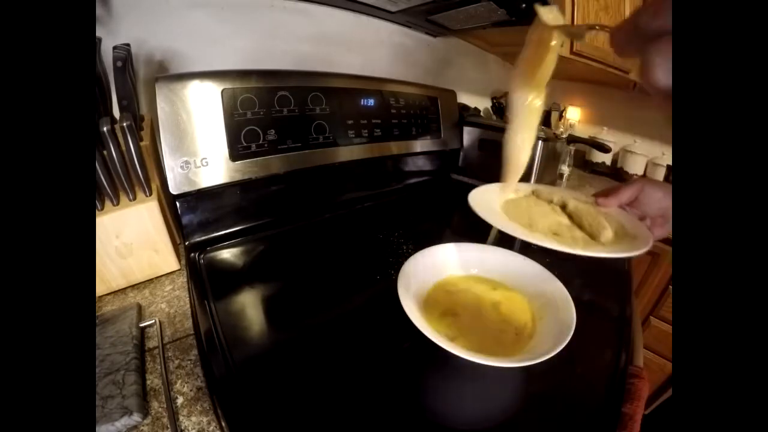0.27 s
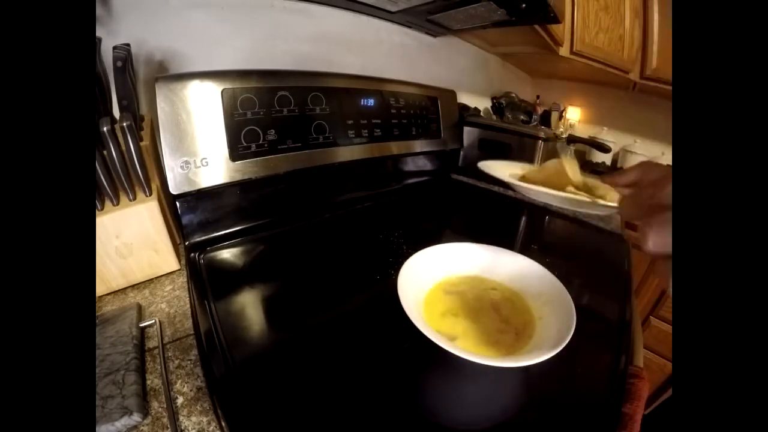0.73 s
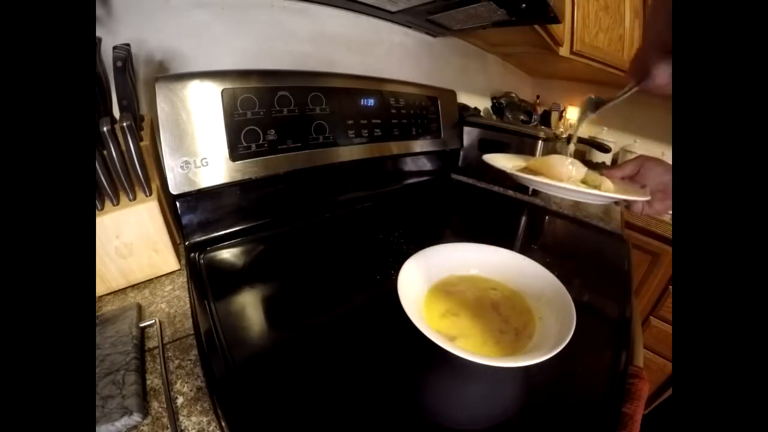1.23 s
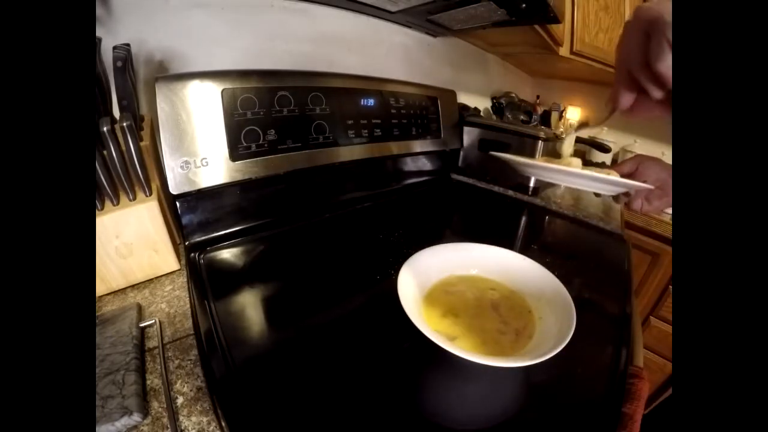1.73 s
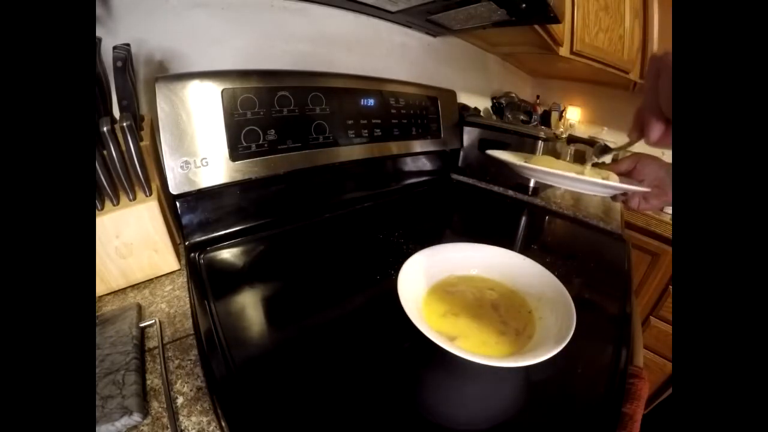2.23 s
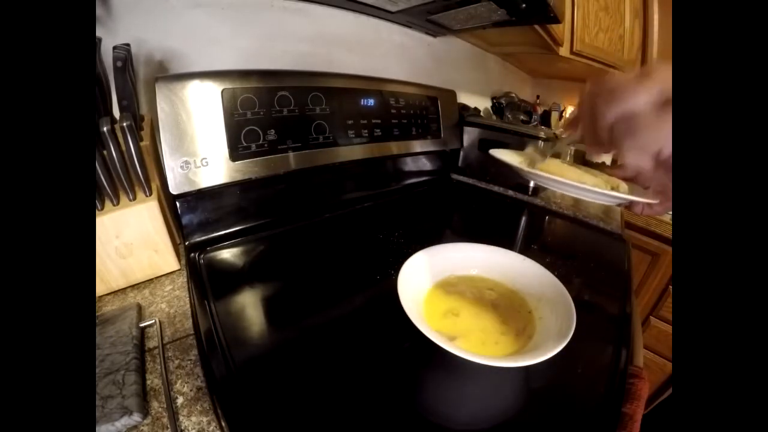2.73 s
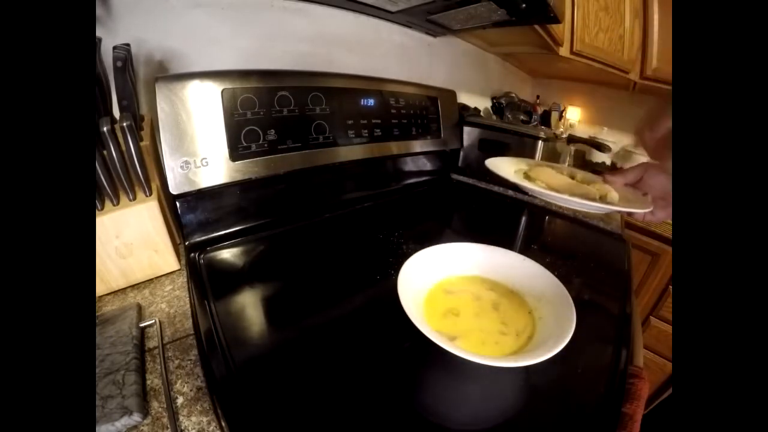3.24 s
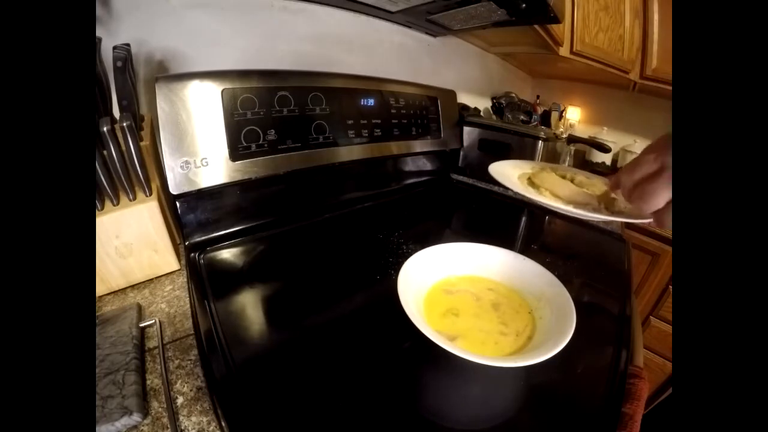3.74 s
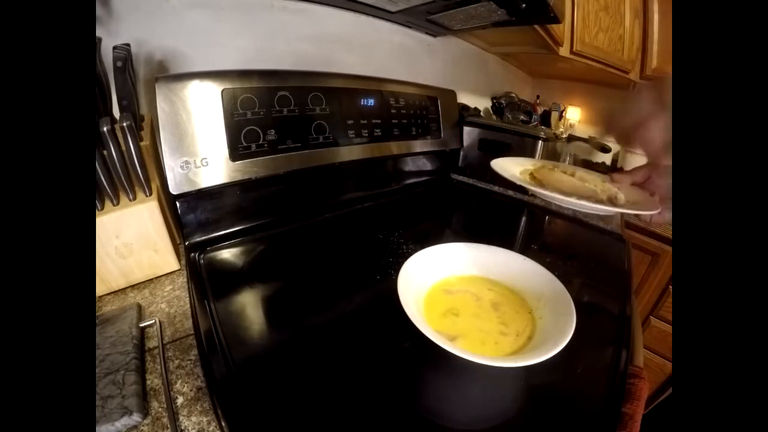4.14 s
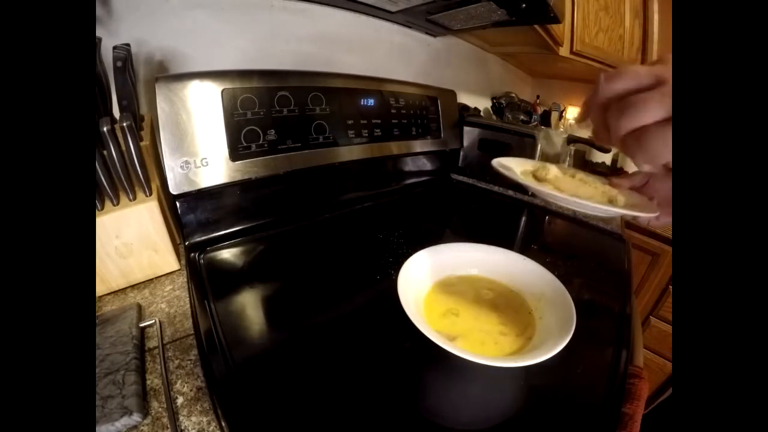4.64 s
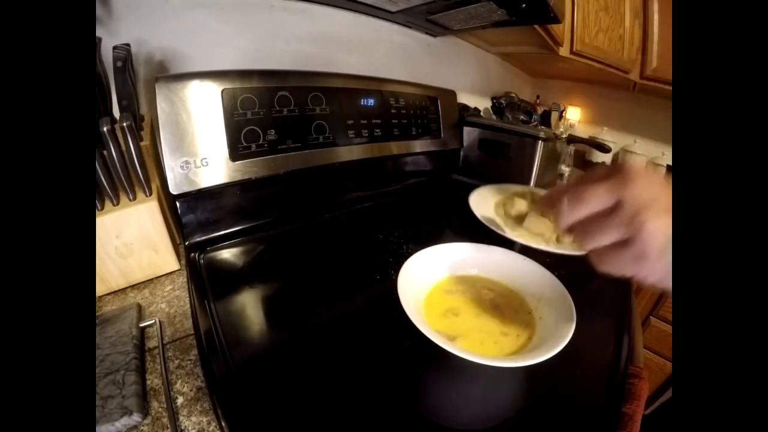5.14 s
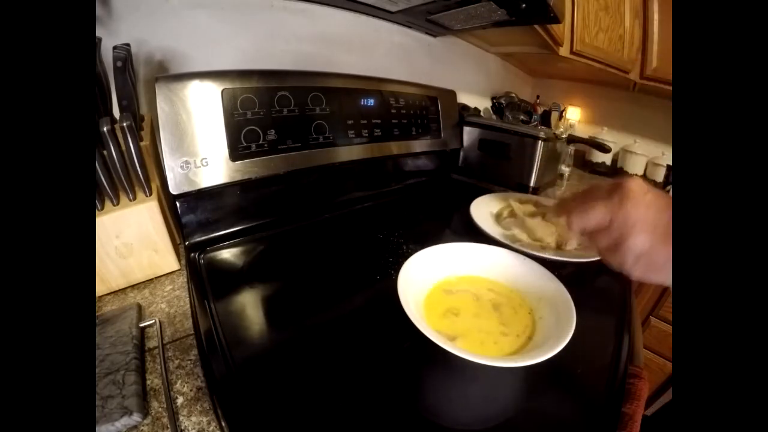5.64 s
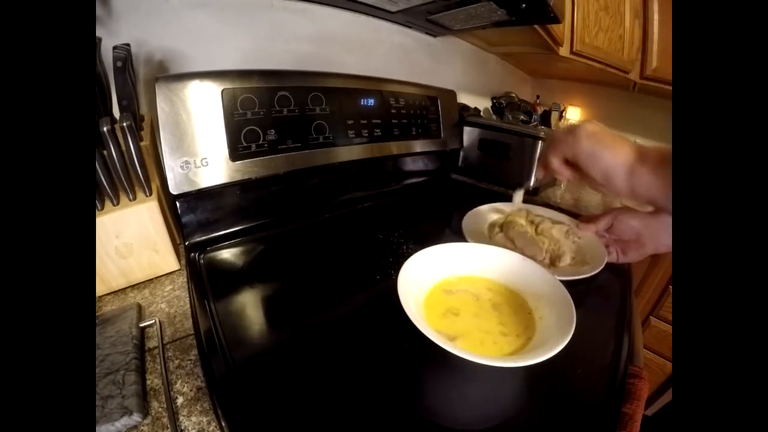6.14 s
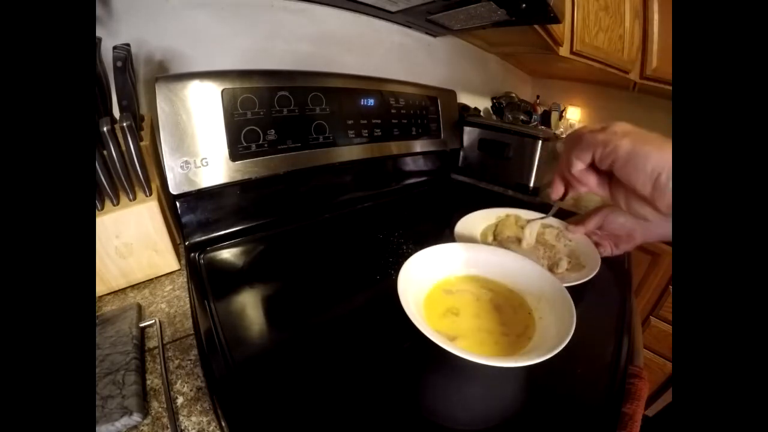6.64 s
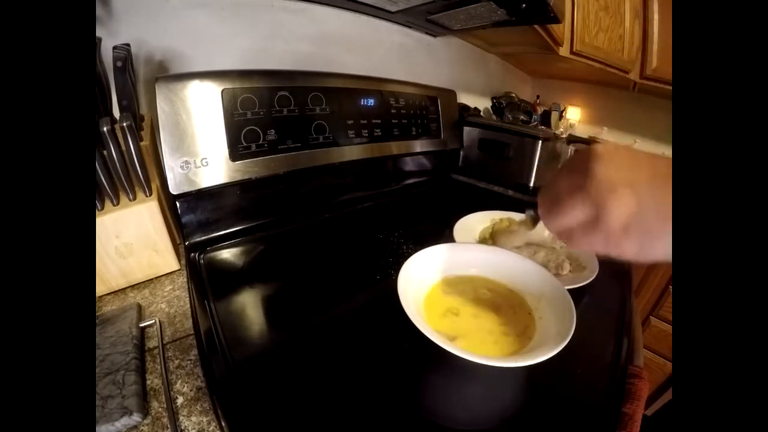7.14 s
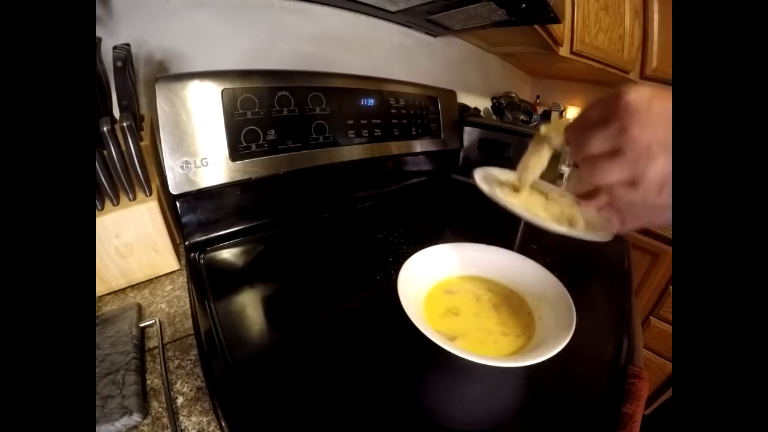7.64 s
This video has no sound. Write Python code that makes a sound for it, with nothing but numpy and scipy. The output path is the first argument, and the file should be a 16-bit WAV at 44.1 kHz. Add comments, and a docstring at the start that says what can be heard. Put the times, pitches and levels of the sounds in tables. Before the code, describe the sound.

In a small kitchen with a steady low hum, food lands with a soft wet plop. A fork clatters, scrapes and briefly squeaks on a ceramic plate, then gives two sharp clinks and some lighter taps. Near the end, something knocks hard against the microphone stand and rubs and judders along it with a low rumble. Everything sounds close.

```python
"""A mains hum, a low drone and room air open on a soft wet plop of food; a faint hiss comes and goes.
A fork taps, scrapes and squeaks on a hand-held ceramic plate. The plate's ring is short, damped by
hand and food; the small kitchen carries it on. Late on, the microphone's stand is held and rumbles:
something knocks against it, then rubs and judders along it, ringing its modes by stick-slip."""
import sys
import numpy as np
from scipy import signal
from scipy.fft import rfft, irfft, next_fast_len
from scipy.io import wavfile
from scipy.ndimage import uniform_filter1d

SR = 44100
rng = np.random.default_rng(int(sys.argv[2]) if len(sys.argv) > 2 else 0)


def file_out(sig):
    """Save sig as 16-bit WAV at sys.argv[1]."""
    # one column per channel
    cols = np.atleast_2d(sig).T
    # limit, then scale
    lim = np.clip(cols, -1, 1)
    pcm = np.round(lim * 32767).astype(np.int16)
    wavfile.write(sys.argv[1], SR, pcm)


N = 347949
TIME = np.arange(N) / SR
RING = TIME[:SR // 2]  # time axis of one ring-out

# mains hum partials: (harmonic number, level [dB])
HUM_PARTIALS = [(1, -35.5), (2, -48.5), (4, -75.5), (17, -73.5)]
# room air: (frequency [Hz], gain [dB])
AIR_EQ = [(110, -32), (180, -8), (319, -4.5), (471, -12), (517, -8.5), (952, -16), (1040, -14),
          (1150, -16.5), (1660, -18), (1820, -16.5), (2000, -19.5), (15000, -26)]
# low drone under the hum: (frequency [Hz], gain [dB])
DRONE_EQ = [(10, -11.5), (28, -7.5), (42, -7.5), (75, -4.5), (95, -16), (125, -5.5), (170, -18),
            (300, -36.5), (900, -82)]
# width of the room tone, side against mid: (frequency [Hz], gain [dB])
ROOM_WIDTH = [(60, -3), (110, -10.5), (200, -9.5), (380, -7.5), (700, -6.5), (1290, -5.5), (2380, -3),
              (4400, -1), (8120, -0.5), (15000, 0)]
# wet plop: (frequency [Hz], gain [dB])
PLOP_EQ = [(200, -7), (500, 5), (900, -1), (1500, -14), (4000, -32), (12000, -45)]
# hiss cues: (start [s], length [s], level [dB])
HISS_CUES = [(0.628, 0.093, -57), (1.076, 0.5, -60), (3.608, 0.41, -58), (4.35, 0.4, -67),
             (5.454, 0.25, -70), (7.505, 0.38, -63.5)]
# band of the hiss: (frequency [Hz], gain [dB])
HISS_EQ = [(1500, -30), (3000, -6), (4300, -1), (5900, 0), (6800, -18), (10000, -40)]
# ceramic plate: (frequency [Hz], t60 before contact damping [s], well gain [dB], rim gain [dB])
PLATE_MODES = [(750, 0.12, -52.5, -8), (963, .04, -13.5, -73), (1280, 0.0536, -12, -18),
               (1345, 0.094, -6, -16), (1586, 0.045, 7, -16), (2474, 0.035, 4.5, -10),
               (2675, 0.07, -15, -24), (3335, 0.11, -4.5, 5), (3510, 0.086, -8.5, -14),
               (3583, 0.043, -20, -4), (4370, 0.067, -2.5, 6), (5410, 0.055, 3, -29),
               (5416, 0.033, -7.5, 0), (5610, 0.054, -14, -1), (6050, 0.0725, -6.5, -11),
               (6460, 0.046, -11.5, 2), (6970, 0.042, -1, -47), (7680, .06, -23.5, -10),
               (9600, 0.0636, -27, -29), (10700, 0.067, -26.5, -16.5), (11690, 0.064, -20, -28),
               (13550, .07, -22.5, -24)]
# fork on plate: (time [s], level [dB], place [0 well to 1 rim], brightness [dB/octave])
FORK_TAPS = [(0.673, -48.5, 0, 2), (0.8136, -33.5, 0.32, 3), (0.851, -32.5, 0, -7), (0.874, -23.5, 0.5, -2),
             (0.885, -26, 0.5, -1), (.903, -21, 0.86, -2.5), (0.946, -32, 0.6, 0.5),
             (1.034, -34.5, 0.54, 6), (1.996, -15.5, 0.94, 0.5), (2.223, -51, 0.38, -1),
             (2.795, -8.5, 0, 0), (3.462, -38.5, 0, -3.5), (3.546, -44.5, 1, -8), (3.596, -49, 0.4, 3),
             (3.724, -41, 0, -3.5), (3.759, -43, 0, -1), (5.243, -37.5, 0.45, -1), (5.373, -42, 0.42, -0.5),
             (5.4431, -37.5, 0.52, 11.5), (5.540, -48, 0.27, 2)]
# click of the steel tines: (frequency [Hz], gain [dB])
TINE_EQ = [(80, -40), (200, -20.5), (400, -5.5), (850, -2), (2000, -4.5), (4200, 0.5), (6700, -0.5),
           (7700, -7), (9300, -13), (11000, -16.5), (15000, -27)]
# tines sliding on the plate: (time of hardest push [s], level [dB], swell time [s])
SCRAPE_CUES = [(0.69, -54, 0.026), (0.905, -21, 0.027), (3.515, -48.5, 0.03), (3.76, -46, 0.1),
               (5.452, -36.5, 0.013), (5.53, -53.5, 0.12), (7.8, -52.5, 0.041)]
# grit of the sliding tines: (frequency [Hz], gain [dB])
GRIT_EQ = [(250, -84.5), (700, 0), (1000, -17.5), (1450, 4.5), (2000, 0), (2500, 9.5), (3000, 2.5),
           (3850, 5), (6500, -10), (7700, -14), (9300, -10), (15000, -70)]
# squeaks of sliding contacts: (peak time [s], pitch [Hz], level [dB], half-length [s])
SQUEAK_CUES = [(1.047, 6500, -40, .022), (1.245, 4880, -57, .025), (1.25, 6800, -57, .025),
               (7.107, 5180, -43, .018), (7.2, 5180, -42, .014), (7.245, 5180, -50, .035)]
# rumble of the swaying stand: (frequency [Hz], gain [dB])
SWAY_EQ = [(8, -12), (25, 8), (45, 0.0), (90, -7.0), (160, -6.5), (500, -54.5)]
# the stand: (frequency [Hz], t60 before contact damping [s], gain [dB])
STAND_MODES = [(87.5, 0.24, -3), (182.5, 0.13, 3.5), (314, 0.061, 2), (501, 0.17, -1), (597.3, 0.17, -0.5),
               (913, 0.075, -0.5), (1050, 0.044, -6.5), (1312, 0.16, -7.5), (1700, 0.54, -24.5),
               (2507, .06, -10), (3460, 0.055, -11.5)]
# blows on the stand: (time [s], level [dB], brightness [dB/octave])
STAND_BLOWS = [(6.5061, -4.5, 3), (6.519, -9.5, -12), (7.038, -27.5, -10), (7.073, -18, -7.5),
               (7.086, -18, -5.5), (7.1138, -17, -7.5), (7.1619, -23, -5.5), (7.189, -17, -6.5),
               (7.223, -18, -5), (7.241, -18.5, -32), (7.326, -25, -7)]
# the stand's dull crack: (frequency [Hz], gain [dB])
CRACK_EQ = [(30, -16), (100, 15), (400, -5), (1000, 1), (2800, -8), (4200, -13), (7000, -26),
            (10000, -38.5), (15000, -60)]
# rubs on the stand: (start [s], length [s], base groan [dB], base scratch [dB], swell [dB/s])
RUB_CUES = [(6.552, 0.25, -33.5, -40.5, -14), (6.812, 0.083, -38, -43.5, 90),
            (7.005, 0.06, -42.5, -55, 246), (7.075, 0.178, -29, -51.5, 21), (7.296, 0.07, -27.5, -36.5, -4),
            (7.374, 0.074, -32, -38, 47)]
# scratchy top of a rub: (frequency [Hz], gain [dB])
SCRATCH_EQ = [(710, -27), (1200, -4.5), (1630, 2.5), (1870, -3.5), (2510, -2), (3170, -5), (3450, -7.5),
              (3920, -10), (5380, -14), (15000, -43)]
# kitchen reverb: (frequency [Hz], t60 [s])
KITCHEN_DECAY = [(150, 0.18), (600, 0.64), (1600, 0.49), (5000, 0.41), (9000, 0.36), (15000, 0.66)]
# width of close sounds, side against mid: (frequency [Hz], gain [dB])
NEAR_WIDTH = [(30, -8.5), (150, -18), (900, -34.5), (2500, -24.5), (5000, -12), (7000, -7.5), (9000, -1),
              (12000, -1)]

MAINS_HZ, TOP_HZ = 60.05, 15250
AIR_DB, DRONE_DB = -56, -51
KNOCK_DRAG_S, DULL_DRAG_S, DULL_TILT_DB = 0.004, 0.0018, -5  # each dB/octave duller adds drag
GRIP_DB, WOBBLE_DB = -35.5, -23.5  # the wobble is relative to its blow


def undb(db):
    """Decibels to gain."""
    return 10 ** (np.asarray(db) / 20)


def unit(x):
    """Scale to rms 1."""
    return x / np.sqrt(np.mean(x ** 2) + 1e-18)


def at(points, hz):
    """Read (frequency [Hz], value) points on a log-frequency axis."""
    f, value = np.transpose(points)
    return np.interp(np.log(hz + 1e-9), np.log(f), value)


def tilt(hz, db_per_octave):
    """Brightness slope in dB, levelling off below 500 Hz."""
    return db_per_octave * np.log2(1 + hz / 500)


def colour(x, eq):
    """Filter by an EQ curve."""
    size = next_fast_len(len(x) + SR // 10)
    gain = undb(at(eq, np.fft.rfftfreq(size, 1 / SR)))
    return irfft(rfft(x, size) * gain, size)[:len(x)]


def noise(eq, count=N):
    """Coloured noise of rms 1."""
    return unit(colour(rng.standard_normal(count), eq))


def walk(rate):
    """Smooth random wander of spread near 1."""
    knots = rng.standard_normal(8000)
    return 1.2 * np.interp(TIME * rate, np.arange(len(knots)), knots)


def fade(t60):
    """Exponential decay over one ring-out."""
    return np.exp(-np.log(1000) * RING / t60)


def held(start, length, attack_s, release_s):
    """Envelope that rises, holds and dies away."""
    age = TIME - start
    return np.clip(age / attack_s, 0, 1) * np.exp(-np.maximum(age - length, 0) / release_s)


def add(track, s, sound):
    """Mix a sound into a track at a time."""
    i = int(s * SR)
    track[i:i + len(sound)] += sound[:N - i]


def slips(count, rate, spread_db):
    """Stick-slip: sparse clicks of uneven size."""
    chance, size = rng.random(count), rng.standard_normal(count)
    return (chance < rate / SR) * np.sign(size) * undb(spread_db * np.abs(size))


def resonance(modes):
    """Ring of (frequency [Hz], t60 [s], energy [dB]) modes, each detuned a little by the grip."""
    out = 0
    for hz, t60, db in modes:
        detuned = hz * (1 + 0.0029 * rng.standard_normal())
        ring = unit(np.sin(2 * np.pi * detuned * RING) * fade(t60))
        out += undb(db) * rng.choice([-1, 1]) * ring
    return out


def strike(modes, crack_eq, tilt_db, drag_s, crack_db, crack_s, chatter, rise_s):
    """A touch and a dying run of slips ring the modes; a crack scatters off near surfaces."""
    skid = slips(len(RING), rate=2700, spread_db=3.3) * np.exp(-RING / drag_s)
    push = chatter * np.sqrt(drag_s / 0.0071) * skid / (np.linalg.norm(skid) + 1e-9)
    push[0] += 1  # the first touch
    damping = 1 + drag_s / 0.012  # a lingering contact shortens the ring
    ring = 0
    for hz, t60, db in modes:
        mode = signal.fftconvolve(resonance([(hz, t60 / damping, 0)]), push[:SR // 10])[:len(RING)]
        ring += undb(db + tilt(hz, tilt_db)) * unit(mode)
    crack = noise([(hz, db + tilt(hz, tilt_db)) for hz, db in crack_eq], len(RING))
    crack *= np.exp(-(RING / (crack_s + drag_s)) ** 1.1)
    hit = (unit(ring) + undb(crack_db) * unit(crack)) * (1 - np.exp(-RING / rise_s))
    power = uniform_filter1d(hit ** 2, size=SR // 100, mode="constant")
    return hit / np.sqrt(power.max())  # loudest 10 ms at rms 1


def stereo(mid, side):
    """Left and right from mid and side."""
    return np.array([mid + side, mid - side])


def room_tone():
    """The bed: mains hum in the centre, a drifting low drone and near-steady air around it."""
    hum = 0
    for harmonic, db in HUM_PARTIALS:
        hum += undb(db) * unit(np.sin(2 * np.pi * (harmonic * MAINS_HZ * TIME + rng.random())))
    air_gain = undb(AIR_DB + 0.3 * walk(4))
    mid, side = (air_gain * noise(AIR_EQ) + undb(DRONE_DB + 1.5 * walk(1.7)) * noise(DRONE_EQ)
                 for _ in range(2))
    return stereo(mid + hum, colour(side, ROOM_WIDTH))


def food_plop():
    """A soft wet plop as food leaves the dish: one dark, fast-dying puff of noise."""
    out = np.zeros(N)
    add(out, 0.061, undb(-43.5) * noise(PLOP_EQ, len(RING)) * fade(t60=0.096))
    return out


def hiss():
    """A faint high hiss that comes and goes."""
    envelope = sum(undb(db) * held(s, length, attack_s=0.06, release_s=0.04)
                   for s, length, db in HISS_CUES)
    return noise(HISS_EQ) * envelope


def fork_taps():
    """Where the fork lands decides which modes speak; light taps click, hard ones and the rim ring."""
    out = np.zeros(N)
    for s, db, place, tilt_db in FORK_TAPS:
        modes = [(hz, t60, (1 - place) * well_db + place * rim_db)
                 for hz, t60, well_db, rim_db in PLATE_MODES]
        click_db = -10.5 - 0.11 * db - 3 * place
        tap = strike(modes, TINE_EQ, tilt_db, drag_s=0.0049, crack_db=click_db,
                     crack_s=0.0077, chatter=0.92, rise_s=0.0017)
        add(out, s, undb(db) * tap)
    return out


def fork_scrapes():
    """Sliding tines catch and slip; the pressed plate answers with damped modes."""
    force = 0
    for s, db, swell_s in SCRAPE_CUES:
        from_peak = np.maximum(s - TIME, (TIME - s) / 0.8)  # lets go faster than it builds
        force += undb(db) * np.exp(-from_peak / swell_s)
    catches = slips(N, rate=4500, spread_db=2.5) * undb(2 * walk(200))
    grit = unit(colour(catches, GRIT_EQ))
    body = resonance([(hz, 0.21 * t60, well_db / 2) for hz, t60, well_db, _ in PLATE_MODES])
    ring = unit(signal.fftconvolve(grit, body)[:N])
    return force * (undb(-1) * grit + undb(-5.5) * ring)


def squeaks():
    """Fast stick-slip locks briefly onto an unsteady, rasping pitch."""
    out = 0
    for s, hz, db, half_length in SQUEAK_CUES:
        pitch = hz * (1 + 0.016 * walk(700))
        rasp = undb(3 * walk(250))
        swell = np.exp(-2 * ((TIME - s) / half_length) ** 2)
        out += undb(db) * swell * unit(rasp * np.sin(2 * np.pi * np.cumsum(pitch) / SR))
    return out


def stand_sway():
    """The stand rumbles while it is held, and wobbles after every blow."""
    tremble = undb(GRIP_DB) * held(start=6.32, length=1.3, attack_s=0.12, release_s=0.058)
    wobble_power = sum((undb(db + WOBBLE_DB) * held(s, 0, attack_s=0.0089, release_s=0.24)) ** 2
                       for s, db, _ in STAND_BLOWS)
    return noise(SWAY_EQ) * np.sqrt(tremble ** 2 + wobble_power)


def stand_knocks():
    """A hard double knock rings the stand, later a string of softer judders; dull blows linger."""
    out = np.zeros(N)
    for s, db, tilt_db in STAND_BLOWS:
        drag_s = KNOCK_DRAG_S + DULL_DRAG_S * max(DULL_TILT_DB - tilt_db, 0)
        heft = [(330, 0.43 * db), (480, 0.016)]  # light blows hardly stir the low end
        modes = [(hz, t60, mode_db + at(heft, hz)) for hz, t60, mode_db in STAND_MODES]
        crack_eq = [(hz, band_db + at(heft, hz)) for hz, band_db in CRACK_EQ]
        knock = strike(modes, crack_eq, tilt_db, drag_s, crack_db=1.5,
                       crack_s=0.0058, chatter=0.52, rise_s=0.00032)
        add(out, s, undb(db) * knock)
    return out


def stand_rubs():
    """Uneven slips groan through the stand's modes and scratch on top; each rub tightens or eases."""
    groan_gain = scratch_gain = 0
    for s, length, groan_db, scratch_db, swell_db_per_s in RUB_CUES:
        swell = undb(swell_db_per_s * np.clip(TIME - s, 0, length))
        push = held(s, length, attack_s=0.015, release_s=0.017) * swell
        groan_gain += undb(groan_db) * push
        scratch_gain += undb(scratch_db) * push
    pressure = undb(2.5 * walk(90))
    body = resonance([(hz, 0.39 * t60, db + tilt(hz, -3.4)) for hz, t60, db in STAND_MODES])
    groan = unit(signal.fftconvolve(slips(N, rate=2000, spread_db=1.6) * pressure, body)[:N])
    scratch = unit(colour(slips(N, rate=5000, spread_db=1.7) * pressure, SCRATCH_EQ))
    return groan * groan_gain + scratch * scratch_gain


def kitchen(x, wet_db):
    """Add a diffuse tail that builds within a few ms; each band dies at its own rate, bass first."""
    hz = np.fft.rfftfreq(len(RING), 1 / SR)
    spectrum = rfft(rng.standard_normal(len(RING)))
    tail = 0
    for centre_hz, t60 in KITCHEN_DECAY:
        band = at([(f, float(f == centre_hz)) for f, _ in KITCHEN_DECAY], hz)
        tail += irfft(spectrum * band, len(RING)) * fade(t60)
    tail *= 1 - np.exp(-RING / 0.0015)
    return x + undb(wet_db) * signal.fftconvolve(x, tail / np.linalg.norm(tail))[:N]


def microphone_ports(near):
    """Early reflections set two close ports apart: alike in the bass, wide in the treble."""
    scatter = rfft(rng.standard_normal(len(RING)) * fade(t60=0.035))
    all_pass = irfft(scatter / np.abs(scatter))  # equal strength at all pitches
    reflections = np.roll(all_pass, SR // 1000)[:SR // 40]
    side = colour(signal.fftconvolve(near, reflections)[:N], NEAR_WIDTH)
    return stereo(near, side)


def scene():
    """Plate, stand and plop sit close up in the kitchen, over the room tone."""
    plate = kitchen(fork_taps() + fork_scrapes() + squeaks(), wet_db=-9.5)
    stand = kitchen(stand_knocks() + stand_rubs(), wet_db=-11) + stand_sway()
    near = plate + stand + kitchen(food_plop(), wet_db=-7) + hiss()
    return microphone_ports(near) + room_tone()


def record(dry):
    """The recorder soft-clips the loudest peaks and cuts the top."""
    rounded = dry / (1 + dry ** 6) ** (1 / 6)
    high_cut = signal.ellip(10, 0.1, 90, TOP_HZ, fs=SR, output="sos")
    return signal.sosfilt(high_cut, rounded)


dry = scene()
out = record(dry)
file_out(out)
```